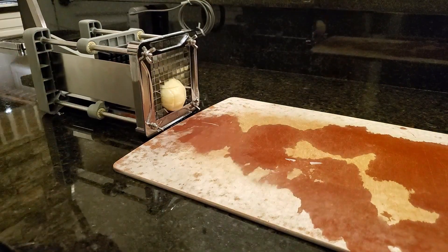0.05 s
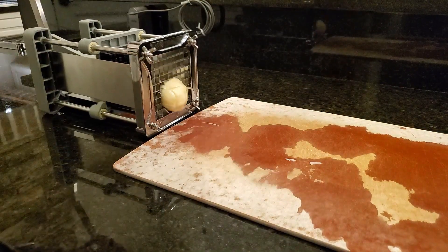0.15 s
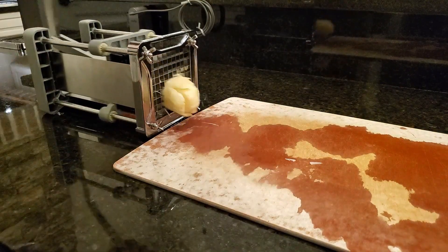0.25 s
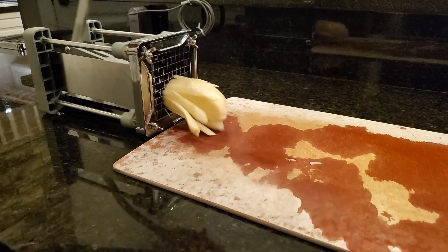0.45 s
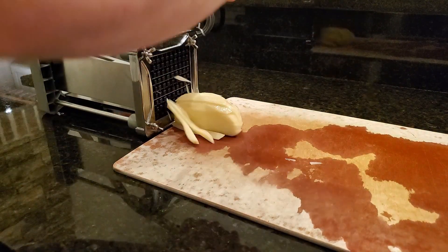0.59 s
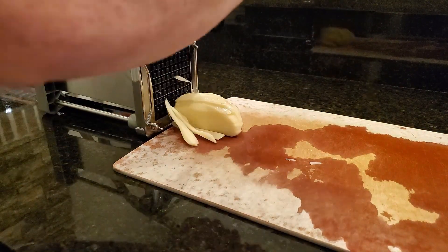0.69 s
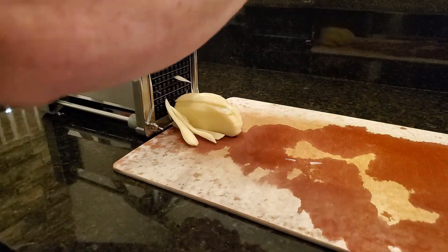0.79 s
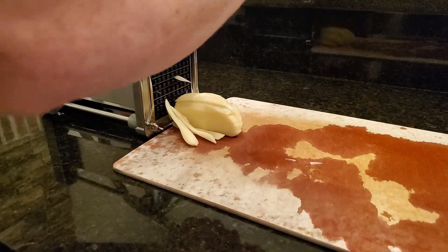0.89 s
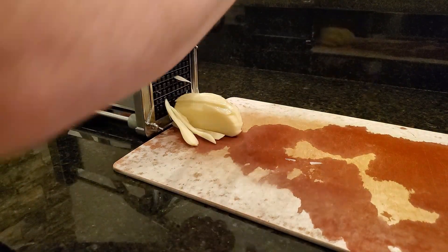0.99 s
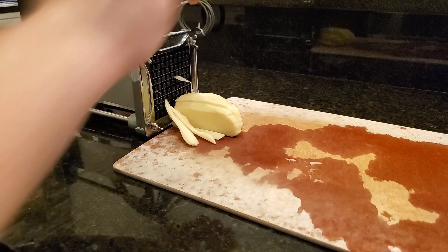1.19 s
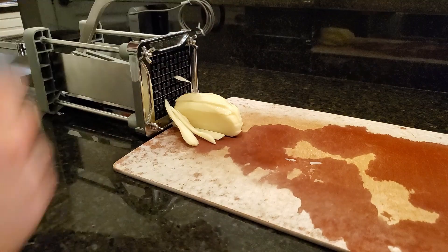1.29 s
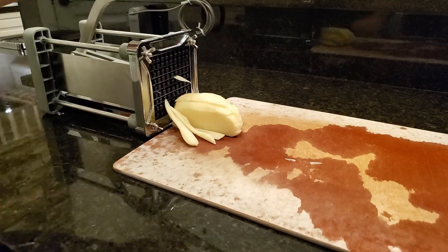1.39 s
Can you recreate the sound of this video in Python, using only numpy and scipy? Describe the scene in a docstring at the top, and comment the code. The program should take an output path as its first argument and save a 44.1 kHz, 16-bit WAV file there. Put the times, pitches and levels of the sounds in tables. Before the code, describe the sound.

Close up in a kitchen, a fry cutter tears through a potato with a crisp crunch, a blade twang and a dull thud. A hard, rattling knock follows as the pusher stops, then a faint swish passes the microphone.

```python
"""Potato through a fry cutter

A lever cutter forces a raw potato through its blade grate on a stone kitchen counter. The flesh tears
in dense crackle and a few longer splits, the blades ring and the frame thuds; the fries slide out and
the pusher knocks against its stop. A sleeve then swishes past the phone, whose left port faces the
cutter. A low kitchen rumble lies under it all."""
import sys
import numpy as np
from scipy import signal
from scipy.fft import rfft, irfft
from scipy.io import wavfile

SR = 44100
rng = np.random.default_rng(int(sys.argv[2]) if len(sys.argv) > 2 else 0)


def master_out(mix):
    """Clip the mix to full scale and print it as 16-bit PCM to the path in sys.argv[1]."""
    frames = np.transpose(np.atleast_2d(mix))
    ceiling = np.clip(frames, -1, 1)
    pcm = np.round(ceiling * 32767).astype(np.int16)
    wavfile.write(sys.argv[1], SR, pcm)


N = 63945
CELLS_PER_S, CELL_SPREAD_DB = 10000, 3
# shading of the right port against the left: f/Hz, level/dB
RIGHT_SHADE = [(200, 1), (380, -5), (700, -7), (1300, -13), (2400, -15), (4400, -18), (8100, -20.5),
               (11000, -15), (15000, -25)]


def tearing(judder_hz=219.9, judder_db=1.3):
    """Cells burst under the blades as the push judders; splits run ahead of the edges."""
    # force on the lever, as loudness of the tearing: t/s, level/dB
    push = [(.226, -51), (.231, -20), (.238, -18.5), (.27, -17), (.315, -21.5), (.345, -23.5), (.38, -27),
            (.41, -32), (.432, -59), (.45, -54.5)]
    # splits running through the flesh: t/s, length/s, level/dB
    splits = [(.2355, .0055, -13), (.257, .008, -14.5), (.281, .003, -19), (.2928, .0052, -11.5),
              (.3035, .0055, -15), (.3135, .0042, -12.5), (.3245, .004, -19), (.3935, .005, -25),
              (.405, .004, -31)]
    # tone of the bursting cells: f/Hz, level/dB
    flesh_eq = [(80, -1.5), (250, 3), (550, -5), (1400, 1), (2500, 0), (3300, -1.5), (4200, 2), (5500, -2),
                (10000, 0), (15500, -4)]
    # brighter tone of the splits: f/Hz, level/dB
    split_eq = [(300, -20.5), (2000, -1), (3300, -18), (4200, 4.5), (5500, -5), (9000, -3.5), (13000, -3),
                (15500, -3.5)]
    cells = crackle(CELLS_PER_S, CELL_SPREAD_DB) * fader(push) * amp(judder_db * wander(judder_hz))
    runs = sum(amp(db) * burst(s, length, release=.0013) for s, length, db in splits)
    return colour(cells, flesh_eq) + colour(crackle(SR / 2, spread_db=2) * runs, split_eq)


def blade_ring(cut):
    """The cut rings the grate; the bowed blades twang back as the potato gives way."""
    # modes of the blade grate: f/Hz, level/dB, t60/s
    blade_modes = [(1233, -16, .4), (1388, -1, .75), (1561, -4, .36), (1590, 3.5, .42), (1976, -9, .25),
                   (2229, -12, .4), (2471, -6, .42), (2500, -8, .4), (3092, -10, .25), (3861, -7, .12),
                   (3926, -7, .12), (4047, -4, .17), (4320, -2, .12), (4434, -10, .2), (4473, -5, .15),
                   (12550, -10, .2), (15570, -4, .15)]
    flick = amp(10.5) * colour(impulse(.266), [(1600, 0), (2400, -4), (4000, -9), (15000, -14)])
    return ring(amp(-13) * cut + flick, blade_modes)


def frame_thuds(cut):
    """The cut shakes the frame, which thuds on the counter."""
    # modes of frame and counter: f/Hz, level/dB, t60/s
    frame_modes = [(52, -3, .2), (97, 0, .2), (112, -4, .18), (172, -7, .25), (223, -8, .2), (307, -8, .25)]
    # hits on the counter: t/s, level/dB
    hits = [(0.2311, -28.5), (0.251, -31), (0.2695, -22), (0.393, -43), (0.594, -41), (0.63, -36.5)]
    return amp(-15) * ring(cut, frame_modes) + sum(thud(s, db) for s, db in hits)


def thud(start, db, hz=66):
    """A heavily damped low swing of the counter."""
    swing = np.sin(2 * np.pi * hz * (clock() - start))
    return 2 * amp(db) * burst(start, 0, release=.0098) * swing


def knocking():
    """The pusher meets its stop: each blow is a hard snap and a brief rattle."""
    # blows on the stop: t/s, level/dB
    blows = [(.571, -48), (0.58, -40.5), (0.595, -30), (0.596, -17), (0.5987, -22), (.607, -28),
             (.617, -34.5), (.622, -37), (.655, -39.5)]
    # tone of the contact: f/Hz, level/dB
    knock_eq = [(80, -4), (160, 5), (280, 4), (450, -2), (750, 5), (1300, 6.5), (1700, 7), (2800, -0.5),
                (3800, 0.5), (6400, -14), (10000, -16.5), (15500, -18.5)]
    rattle = sum(amp(db) * burst(s, 0, release=.002) for s, db in blows) * crackle(SR / 2, spread_db=2)
    snaps = amp(7) * sum(amp(db) * impulse(s) for s, db in blows)
    return colour(snaps + rattle, knock_eq)


def stop_ring(knock):
    """Pusher and stop ring briefly after each blow."""
    # modes of pusher and stop: f/Hz, level/dB, t60/s
    stop_modes = [(700, -3, .03), (1130, -3, .03), (1270, 0, .04), (1680, 2, .035), (1760, -2, .03),
                  (2400, -7, .04), (3850, -7, .05)]
    return amp(-6) * ring(knock, stop_modes)


def sliding():
    """The wet fries rub out between the blades."""
    # swell of the rubbing: t/s, level/dB
    slide = [(.34, -45.5), (.41, -32.5), (.47, -39), (.535, -40), (.555, -48.5), (.6, -56)]
    # tone of wet flesh on the blades: f/Hz, level/dB
    wet_eq = [(200, 7.5), (700, -3.5), (1400, 1), (3000, 1.5), (4600, 2), (7000, -1), (10000, -5),
              (15500, -8)]
    return colour(crackle(CELLS_PER_S, CELL_SPREAD_DB) * fader(slide), wet_eq)


def squeaking(peak_s=.394, width_s=.016):
    """The last of the potato sticks and slips through the blades."""
    # resonances of the squeak: f/Hz, level/dB, t60/s
    squeak_modes = [(97, -3, .1), (191.5, -8, 0.071), (1272.5, -6.5, 0.066), (2210, -3.5, 0.07),
                    (2570, 0.5, .06), (2530, -5, 0.02), (5148, -10, 0.046)]
    grip = np.exp(-((clock() - peak_s) / width_s) ** 2 / 2)
    return amp(-31.5) * ring(crackle(rate=2200, spread_db=2) * grip, squeak_modes)


def ticking():
    """Small ticks as the potato seats and the linkage settles, each around its own pitch."""
    # ticks: t/s, level/dB, centre f/Hz, decay/s
    ticks = [(0.1728, -44, 1750, 0.018), (0.1952, -47.5, 6000, 0.006), (0.209, -49.5, 12500, 0.0055),
             (.2187, -33, 6000, 0.006), (0.951, -65, 3100, .002), (1.011, -68, 5980, 0.0037)]
    sound = np.zeros(N)
    for s, db, hz, decay in ticks:
        band = [(hz / 4, -24), (hz / 2, -7), (hz, 2.5), (hz * 2, -16), (hz * 8, -30)]
        sound += colour(rng.standard_normal(N) * amp(db) * burst(s, 0, decay), band)
    return sound


def sleeve_swish():
    """A sleeve brushes by, close to the left port."""
    # swell of the passing sleeve: t/s, level/dB
    swell = [(.8, -105), (1.15, -85), (1.25, -68), (1.32, -58.5), (1.39, -56.5), (1.45, -61)]
    # airy tone of cloth: f/Hz, level/dB
    cloth_eq = [(300, -9), (1500, -16.5), (2300, -10), (3100, -2.5), (5000, -2.5), (7000, -1.5),
                (10000, -5), (15500, -5.5)]
    return np.array([amp(db) * colour(rng.standard_normal(N), cloth_eq) * fader(swell)
                     for db in (0, -26)])


def handling():
    """Hands on the cutter make a dull shuffle that fades before the push."""
    # tone of the shuffle: f/Hz, level/dB
    shuffle_eq = [(30, -38), (95, -18), (160, -30.5), (300, -43.5), (800, -43), (1400, -56), (4000, -57.5),
                  (8000, -66.5), (15500, -61)]
    shuffle = colour(rng.standard_normal(N) * burst(0, hold=.028, release=.045), shuffle_eq)
    return np.array([shuffle, colour(shuffle, RIGHT_SHADE)])


def early_reflections(x, db):
    """Direct sound plus first reflections off counter and board; long waves pass unscattered."""
    scatter = rng.standard_normal(N) * burst(.0004, 0, release=.006)
    scatter = colour(scatter / np.linalg.norm(scatter), [(150, -13.5), (1200, 1.5)])
    loss_db = -10 * np.log10(1 + amp(db) ** 2)  # the reflections take their energy from the direct sound
    return colour(x, [(150, .0064), (1200, loss_db)]) + amp(db + loss_db) * convolve(x, scatter)


def room_tail(build_s=.0072):
    """Diffuse response of the kitchen, band by band; the treble dies first."""
    # kitchen reverb time: f/Hz, t60/s
    reverb_times = [(100, 1), (250, .85), (600, 0.56), (1500, 0.49), (4000, 0.34), (8000, .31),
                    (16000, 0.3)]
    hz, t60s = np.array(reverb_times).T
    t, spectrum = clock(), rfft(rng.standard_normal(N))
    log_f = np.log(np.maximum(np.fft.rfftfreq(N, 1 / SR), 1))
    tail = np.zeros(N)
    for weights, t60 in zip(np.eye(len(hz)), t60s):
        band = irfft(spectrum * np.interp(log_f, np.log(hz), weights), N)
        tail += band * amp(-60 * t / t60)
    tail *= 1 - np.exp(-t / build_s)
    return tail / np.linalg.norm(tail)


def room_tone():
    """Low kitchen rumble reaches both ports, each with a faint hiss of its own."""
    # tone of the rumble: f/Hz, level/dB
    rumble_eq = [(20, -63.5), (40, -38), (58, -26.5), (85, -39.5), (115, -36.5), (170, -47.5), (300, -55.5),
                 (600, -70), (1500, -78.5), (4000, -85), (16000, -81.5)]
    rumble = colour(rng.standard_normal(N), rumble_eq)
    hiss = amp([[-85], [-86]]) * rng.standard_normal((2, N))
    return np.array([rumble, colour(rumble, RIGHT_SHADE)]) + hiss


def amp(db):
    """Decibels to gain."""
    return 10 ** (np.asarray(db) / 20)


def clock():
    """Time of each sample in seconds."""
    return np.arange(N) / SR


def fader(points):
    """Gain along (t/s, level/dB) points, silent outside them."""
    s, db = np.array(points).T
    return amp(np.interp(clock(), s, db)) * (clock() >= s[0]) * (clock() <= s[-1])


def burst(start, hold, release):
    """Envelope with instant attack, hold and exponential release, in seconds."""
    age = clock() - start
    return (age >= 0) * np.exp(-np.maximum(age - hold, 0) / release)


def impulse(start):
    """One-sample click at a time in seconds."""
    return 1. * (np.arange(N) == int(start * SR))


def crackle(rate, spread_db):
    """Tiny random snaps of uneven size, about `rate` a second, rms 1."""
    snaps = (rng.random(N) < rate / SR) * rng.choice([-1, 1], N)
    snaps = snaps * amp(spread_db * rng.standard_normal(N))
    return snaps / np.std(snaps)


def wander(hz):
    """Smooth random modulation with a spread of 1."""
    return np.interp(clock() * hz, np.arange(N), rng.standard_normal(N)) / np.sqrt(2 / 3)


def convolve(x, response):
    """Pass a sound through an impulse response."""
    return signal.fftconvolve(x, response)[:N]


def colour(x, points, size=8192):
    """Minimum-phase EQ through (f/Hz, level/dB) points."""
    hz, db = np.array(points).T
    f = np.maximum(np.fft.rfftfreq(size, 1 / SR), 1)
    cepstrum = irfft(np.log(amp(np.interp(np.log(f), np.log(hz), db))))
    cepstrum[1:size // 2] *= 2
    cepstrum[size // 2 + 1:] = 0
    return convolve(x, irfft(np.exp(rfft(cepstrum))))


def ring(x, modes):
    """Drive decaying modes; each one's level sets its share of the energy."""
    t = clock()
    response = sum(amp(db - 60 * t / t60) / np.sqrt(t60) * np.sin(2 * np.pi * hz * t)
                   for hz, db, t60 in modes)
    return convolve(x, response / np.linalg.norm(response))


def scene():
    """Cutter and sleeve in the kitchen; the shaded right port also hears the back of the grate."""
    cut, knock = tearing() + sliding(), knocking()
    cutter = cut + squeaking() + blade_ring(cut) + frame_thuds(cut) + ticking()
    rear = amp(3.5) * colour(tearing() + sliding(), [(150, -9.5), (700, -1.5), (2000, -.5)])
    close = cutter + knock + stop_ring(knock)
    left = early_reflections(close, db=-10.5)
    right = colour(early_reflections(close, db=-2.5) + rear, RIGHT_SHADE)
    send = amp(-15.5) * cutter + amp(-7) * knock
    reverb = np.array([amp(db) * convolve(send, room_tail()) for db in (0, -9)])
    bump = thud(start=1.334, db=-46)  # the arm nudges the counter
    return np.array([left, right]) + reverb + sleeve_swish() + handling() + bump + room_tone()


def record(dry):
    """The ports lose the deepest bass, dip above 7 kHz and lift the top, which is then cut off."""
    # tone of both ports: f/Hz, level/dB
    port_eq = [(100, -3), (6800, 2), (7400, -5), (8400, -3), (10000, -1), (12500, 3.5), (15500, 8)]
    low_cut = signal.butter(4, 33, "high", fs=SR, output="sos")
    high_cut = signal.ellip(10, .2, 80, 15680, fs=SR, output="sos")
    heard = np.array([colour(channel, port_eq) for channel in dry])
    return signal.sosfilt(high_cut, signal.sosfilt(low_cut, heard))


dry = scene()
out = record(dry)
master_out(out)
```